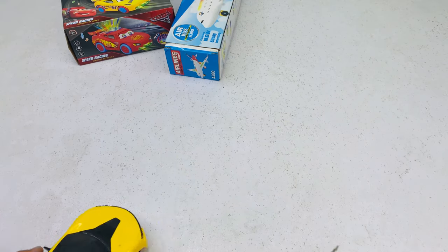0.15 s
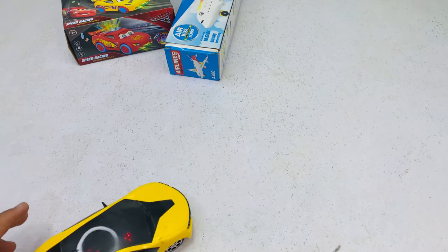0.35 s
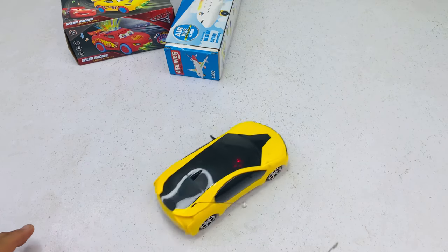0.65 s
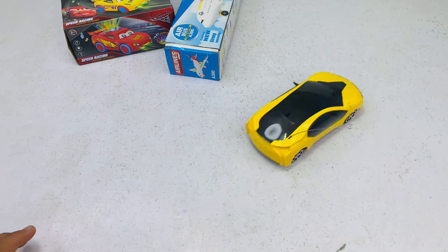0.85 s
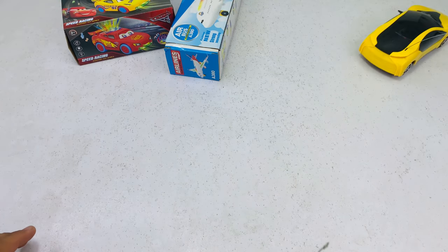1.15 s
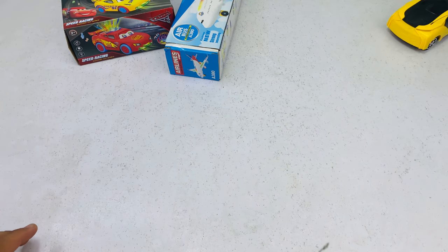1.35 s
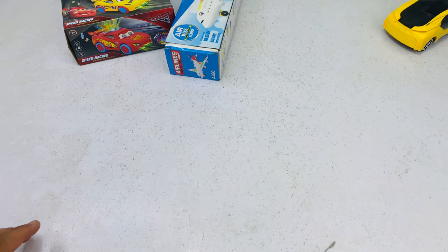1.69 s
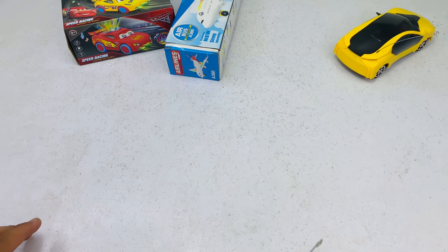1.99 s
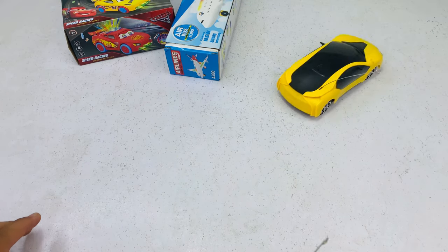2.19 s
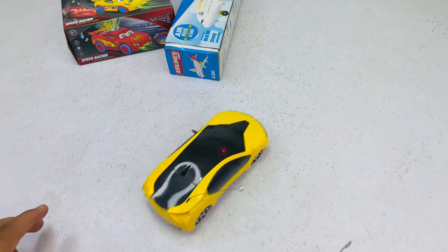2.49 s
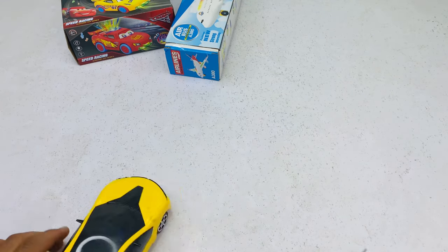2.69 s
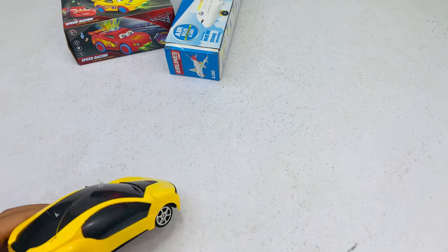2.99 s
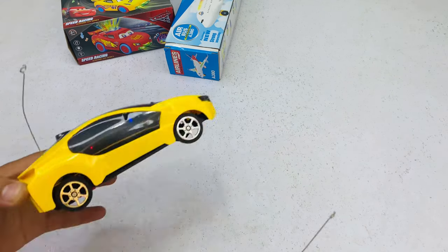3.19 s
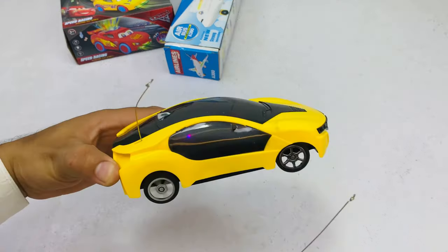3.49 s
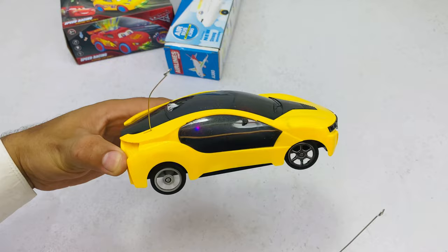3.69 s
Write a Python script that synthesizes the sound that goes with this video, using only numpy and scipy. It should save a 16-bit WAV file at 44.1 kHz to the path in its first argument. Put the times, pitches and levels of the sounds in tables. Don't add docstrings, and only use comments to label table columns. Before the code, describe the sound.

A toy car's plastic gears rattle and whir over hollow boards, then spin faster in the hand.

```python
import sys
import numpy as np
from scipy import signal
from scipy.fft import rfft, irfft, next_fast_len
from scipy.io import wavfile
from scipy.ndimage import uniform_filter1d, map_coordinates

SR = 44100
rng = np.random.default_rng(int(sys.argv[2]) if len(sys.argv) > 2 else 0)


def master_out(mix):
    frames = np.transpose(np.atleast_2d(mix))
    ceiling = np.clip(frames, -1, 1)
    pcm = np.round(ceiling * 32767).astype(np.int16)
    wavfile.write(sys.argv[1], SR, pcm)


def decibels_to_gain(level_db):
    exponent = np.asarray(level_db, float) / 20
    return 10 ** exponent


N = 169785

# time in seconds, effort in dB, brightness in dB.
DRIVE_EFFORT = [(0, -24, -6.5), (.11, -45, -4), (.26, -31, -4), (.32, -38, -4), (.66, -32, -0.5),
                (1.03, -28, 0), (1.2, -35, 5.5), (1.4, -48.5, 2), (1.47, -62, -10), (1.66, -60, -8),
                (1.73, -48, -0.5), (1.92, -38.5, 1.5), (2.01, -41, 0.5), (2.08, -34.5, 1.5),
                (2.6, -27.5, 0.5), (2.76, -38, 0), (2.85, -30, 4), (3.22, -54.5, 9)]
# time in seconds, nearness from 0 to 1.
NEARNESS = [
    (0, 0.96),
    (.6, 0.79),
    (1, 0.53),
    (1.4, 0.2),
    (1.9, 0.3),
    (2.4, 0.4),
    (2.8, 1),
]
# time in seconds, level in dB.
GEAR_STRAIN = [(0, -72.5), (.6, -57), (1.05, -58), (1.35, -84), (1.62, -78), (1.72, -56), (1.95, -53.5),
               (2.2, -52), (2.75, -50), (2.84, -43.5), (3.08, -52.5), (3.151, -80)]
# centre in Hz, width in Hz, level in dB.
WHINE_PEAKS = [(3550, 190, -1), (4360, 1000, 0)]
# centre in Hz, width in Hz, level in dB.
SHELL_ON_FLOOR = [(483.6, 40, 1), (643, 22, 3.5), (696, 41, -0.5), (770.7, 25, 6.5), (806.5, 15.5, 7),
                  (850, 26, 3.5), (901.5, 15.5, 6), (943, 29, 5), (988, 30, 3.5), (1039.6, 32, 4),
                  (1210, 122, -3.5), (1413, 130, -9.5), (3575, 147, -13.5), (4240, 850, -22.5)]
# frequency in Hz, level in dB.
FLOOR_FIZZ = [(250, -20), (900, -4), (1800, -7.5), (2900, -13.5), (4400, -17.5), (5500, -23.5),
              (11000, -26), (15000, -40)]
# time in seconds, level in dB.
BOARD_LOAD = [(0, -48.5), (.3, -55), (.66, -41), (.95, -40), (1.12, -32.5), (1.42, -41.5), (1.56, -57.5),
              (1.66, -45.5), (1.8, -41.5), (1.92, -34), (2.01, -36.5), (2.2, -34), (2.7, -39.5),
              (2.86, -47), (3.451, -56), (3.75, -46)]
# centre in Hz, width in Hz, level in dB.
BOARD_MODES = [(164.8, 5.1, -4), (194, 10.3, -1), (217.1, 9.8, 0), (236.8, 7.8, -2.5), (263.4, 17, -2.5),
               (305.6, 6.6, -2), (370, 40, -19)]
# start in seconds, peak in dB, pitch in Hz.
BUMPS = [(0.057, -26.5, 58.2), (0.148, -29, 70.2), (0.3, -25, 64.4), (0.359, -27, 64.2),
         (0.449, -27.5, 73.2), (0.514, -27.5, 66.6), (0.661, -29, 71.5), (0.781, -41, 68),
         (0.871, -24, 66.4), (1.022, -22.5, 68), (1.088, -28, 70.0), (1.177, -37, 71.2), (1.267, -30, 68.4),
         (1.429, -34, 79.6), (1.641, -41, 93.4), (1.72, -33.5, 83.7), (1.881, -33.5, 85.6),
         (2.051, -34, 64), (2.103, -29, 75), (2.206, -24, 69), (2.308, -20.5, 79.4), (2.417, -20, 71.5),
         (2.595, -29, 67), (2.675, -18.5, 64.6), (2.898, -46, 72.7)]
# time in seconds, effort in dB, brightness in dB.
SPIN_EFFORT = [
    (3.16, -57, -19),
    (3.25, -39.5, -13.5),
    (3.33, -34.5, -3.5),
    (3.45, -31, -0.5),
    (3.6, -29.5, -1),
    (3.7, -29.5, 1.5),
    (3.85, -32.5, 5),
]
# centre in Hz, width in Hz, level in dB.
SHELL_IN_HAND = [(486, 38, 2.5), (1047, 182, 1.5), (1204, 200, 3.5), (1393, 197, 2), (1634, 72, 1.5),
                 (2500, 990, -17), (3400, 130, -7.5), (4130, 1500, -13)]
# frequency in Hz, level in dB.
HAND_FIZZ = [(200, -26), (700, -6), (1500, -5), (3000, 2), (5500, -1), (8000, -2), (11000, -2),
             (15000, -19)]
# start in seconds, peak in dB.
WHEEL_KNOCKS = [(3.199, -44), (3.236, -37), (3.259, -33), (3.281, -28), (3.304, -21), (3.334, -22),
                (3.36, -21.5), (3.385, -20), (3.426, -21), (3.448, -22), (3.472, -14.5), (3.505, -18),
                (3.526, -14), (3.557, -14), (3.579, -22), (3.616, -26), (3.649, -19), (3.679, -20.5),
                (3.714, -35), (3.738, -30), (3.789, -21), (3.816, -26), (3.838, -22)]
# frequency in Hz, level in dB, t60 in seconds.
KNOCK_MODES = [(1180, -1, 0.019), (1407, 1, 0.016), (1610, -8.5, 0.016), (3350, -14, 0.007)]
# start in seconds, snap peak in dB, shake level in dB, length in seconds.
SHELL_JOLTS = [(0.034, -31, -32, 0.019), (0.135, -60, -31, 0.011), (0.195, -58, -26.5, 0.024),
               (0.253, -48, -27.5, 0.017), (0.464, -30, -31, 0.024), (0.5327, -29, -27.5, 0.016),
               (0.587, -44, -36, .01), (0.627, -29, -33, 0.013), (0.677, -37, -28, .01),
               (0.7694, -25.5, -26, 0.018), (0.808, -38, -29, .01), (0.944, -17, -27, 0.0097),
               (1.108, -33, -29, .015), (1.695, -55, -42.5, 0.032), (1.878, -30, -47, 0.0061),
               (2.063, -40, -25, 0.023), (2.09, -28, -22, 0.0066), (2.187, -35, -23, 0.0082),
               (2.305, -40, -24, .03), (2.316, -21, -29, 0.012), (2.554, -35, -22, .008),
               (2.64, -18, -40, 0.0034), (2.646, -13.5, -14.5, 0.013), (2.655, -19.5, -22.5, 0.0093),
               (2.676, -20, -18, 0.015), (2.735, -53, -20.5, 0.0089), (2.777, -42, -26, 0.008),
               (2.799, -38, -42, 0.0065), (2.825, -25, -30, 0.028), (2.846, -22, -26.5, 0.056),
               (2.907, -24, -54, 0.059), (2.967, -28, -45, 0.0045), (3.038, -25, -31, 0.012),
               (3.112, -19, -25.5, 0.0067), (3.195, -40, -47, 0.024), (3.26, -26, -29, 0.0056),
               (3.318, -30, -30, 0.0055), (3.3825, -21, -27, 0.006), (3.446, -23, -40, 0.0054),
               (3.715, -26, -27, 0.0092)]
# frequency in Hz, level in dB.
SNAP_COLOUR = [(800, -41), (2000, 10), (4500, 2), (8000, -2.5), (12000, -15.5), (15500, -79.5)]
# frequency in Hz, t60 in seconds.
WALL_T60 = [(100, 0.48), (1000, 0.2), (5000, 0.14), (12000, 0.019)]
# frequency in Hz, level in dB.
ROOM_COLOUR = [(15, -40), (25, 6), (80, 6), (120, -17), (146, 4), (248, -30), (475, -12), (8000, -81),
               (10400, -93), (17600, -120)]
# frequency in Hz, left-right likeness from 0 to 1.
PORT_LIKENESS = [(60, 0.91), (250, 0.89), (700, 0.27), (3000, 0.27), (5500, 0.13), (7200, 0.71),
                 (8500, 0.78)]
# frequency in Hz, lead of the left port in radians.
PORT_LEAD = [(0, 0), (1380, .4), (1640, 1.6), (4050, .2), (6950, 0), (15150, -4 * np.pi)]

HUM_DB, HUM_WIDTH_HZ = -8, 6.1
BOARD_HZ, BOARD_ATTACK_S, BOARD_DB, BOARD_T60_S = 69.3, 0.0029, 0.5, 0.56
SPOT_DB, SPOT_RATE_HZ = 2, 6
NEAR_AIR_DB, AIR_HZ = 19, 6400
LIFT_S = 2.9
KNOCK_DB, KNOCK_RISE_S = -1.5, .0012
PAN_FAR_DB, PAN_NEAR_DB, PAN_HAND_DB = -1, 3.5, 6.5
WALLS_DB, ROOM_TONE_DB = -11, -52
SUB_HZ, TOP_HZ, TOP_LEVEL = 38, 15900, .3


def noise():
    return rng.standard_normal(N)


def unit(x):
    return x / np.sqrt(np.mean(x ** 2) + 1e-20)


def along(points, hz):
    point_hz, value = np.transpose(points)
    return np.interp(np.log(hz + 1), np.log(point_hz + 1), value)


def over_time(points, right=None):
    return np.interp(np.arange(N) / SR, *np.transpose(points), right=right)


def curves(rows):
    s, effort_db, bright_db = np.transpose(rows)
    t = np.arange(N) / SR
    return np.interp(t, s, effort_db, left=-120, right=-120), np.interp(t, s, bright_db)


def wobble(rate_hz):
    knots = rng.standard_normal(int(N * rate_hz / SR) + 4)
    return map_coordinates(knots, [np.arange(N) * rate_hz / SR])


def filtered(x, response):
    size = next_fast_len(N + SR // 2)
    hz = np.fft.rfftfreq(size, 1 / SR)
    return irfft(rfft(x, size) * response(hz), size)[..., :N]


def resonant(x, peaks):
    def body(hz):
        total = 0
        for k, (centre, width, db) in enumerate(peaks):
            damping = 1j * hz * width
            total = total + (-1) ** k * decibels_to_gain(db) * damping / (centre ** 2 - hz ** 2 + damping)
        return total
    return unit(filtered(x, body))


def coloured(x, spectrum):
    return unit(filtered(x, lambda hz: decibels_to_gain(along(spectrum, hz))))


def chatter(per_s, spread_db, burst_s, hiss):
    chance, size = rng.random((2, N))
    hits = (chance < per_s / SR) * decibels_to_gain(-spread_db * np.log(size + 1e-2))
    scrapes = signal.lfilter([1], [1, -np.exp(-1 / (burst_s * SR))], hits)
    return unit(scrapes) + hiss


def drive():
    effort_db, bright_db = curves(DRIVE_EFFORT)
    near = over_time(NEARNESS)
    teeth = chatter(per_s=600, spread_db=2, burst_s=.0012, hiss=1.1)
    ring = resonant(teeth * noise(), SHELL_ON_FLOOR) * decibels_to_gain(effort_db - 1.5 + 0.58 * wobble(46))
    fizz = coloured(teeth * noise(), FLOOR_FIZZ) * decibels_to_gain(effort_db - 6 + bright_db + 1.5 * wobble(11))
    air = filtered(fizz, lambda hz: hz ** 4 / (hz ** 4 + AIR_HZ ** 4))
    fizz = fizz + air * (decibels_to_gain(NEAR_AIR_DB * (near - 1.0)) - 1)
    hum_db = uniform_filter1d(effort_db, size=3000) + HUM_DB
    hum = resonant(noise(), [(BOARD_HZ, HUM_WIDTH_HZ, 0)]) * decibels_to_gain(hum_db)
    whine = resonant(resonant(teeth * noise(), WHINE_PEAKS), WHINE_PEAKS)
    whine = whine * decibels_to_gain(over_time(GEAR_STRAIN, right=-120))
    return ports(ring + fizz + hum + whine, PAN_FAR_DB + (PAN_NEAR_DB - PAN_FAR_DB) * near)


def boards():
    tyres = chatter(per_s=200, spread_db=1.5, burst_s=.004, hiss=1.8) * noise()
    modes = np.zeros(N)
    for hz, width, db in BOARD_MODES:
        modes += decibels_to_gain(db + SPOT_DB * wobble(SPOT_RATE_HZ)) * resonant(tyres, [(hz, width, 0)])
    return ports(unit(modes) * decibels_to_gain(over_time(BOARD_LOAD)), 0)


def thumps():
    t, out = np.arange(N) / SR, np.zeros(N)
    for s, db, hz in BUMPS:
        age = np.maximum(t - s, 0)
        decay = decibels_to_gain(db + BOARD_DB - 60 * age / BOARD_T60_S)
        out += decay * (1 - np.exp(-age / BOARD_ATTACK_S)) * np.sin(2 * np.pi * hz * age)
    return out


def spin():
    effort_db, bright_db = curves(SPIN_EFFORT)
    teeth = chatter(per_s=400, spread_db=2, burst_s=.0012, hiss=1.4)
    ring = resonant(teeth * noise(), SHELL_IN_HAND) * decibels_to_gain(effort_db - 1.5 + .6 * wobble(20))
    whirr = chatter(per_s=500, spread_db=2.5, burst_s=.0011, hiss=1.2) + .5 * teeth
    fizz = coloured(whirr * noise(), HAND_FIZZ) * decibels_to_gain(effort_db - 3 + bright_db + .5 * wobble(9))
    return ring + fizz


def knocks():
    age, out = np.arange(SR // 20) / SR, np.zeros(N + SR)
    rise = 1 - np.exp(-age / KNOCK_RISE_S)
    for s, db in WHEEL_KNOCKS:
        ring = np.zeros(len(age))
        for hz, level_db, t60_s in KNOCK_MODES:
            luck_db, detune = 2.7 * rng.standard_normal(), 1 + 0.044 * rng.standard_normal()
            decay = decibels_to_gain(level_db + luck_db - 60 * age / t60_s)
            ring += decay * np.sin(2 * np.pi * hz * detune * age)
        out[round(s * SR):][:len(age)] += decibels_to_gain(db + KNOCK_DB) * rise * ring
    return out[:N]


def jolts():
    age, snap, shake = np.arange(SR // 5) / SR, np.zeros(N + SR), np.zeros(N + SR)
    for s, snap_db, shake_db, length_s in SHELL_JOLTS:
        shape = np.exp(-age / max(length_s, .001)) + .4 * np.exp(-age / .002)
        snap[round(s * SR):][:len(age)] += decibels_to_gain(snap_db - 15.5) * shape
        shake[round(s * SR):][:len(age)] += decibels_to_gain(shake_db - 7.0) * shape
    on_floor = np.arange(N) < LIFT_S * SR
    shell = np.where(on_floor, resonant(noise(), SHELL_ON_FLOOR), resonant(noise(), SHELL_IN_HAND))
    grit = unit(chatter(per_s=700, spread_db=2, burst_s=.001, hiss=.6))
    return grit * snap[:N] * coloured(noise(), SNAP_COLOUR) + shake[:N] * shell


def walls(x):
    hz, t, z = signal.stft(rng.standard_normal(SR // 2), SR, nperseg=256)
    decay = decibels_to_gain(-60 * t / along(WALL_T60, hz)[:, None])
    tail = signal.istft(z * decay, SR, nperseg=256)[1]
    return signal.fftconvolve(x, tail[None] / np.linalg.norm(tail), axes=1)[:, :N]


def room_tone():
    return decibels_to_gain(ROOM_TONE_DB) * ports(coloured(noise(), ROOM_COLOUR), 0)


def ports(x, pan_db):
    z = signal.stft(x, nperseg=256)[2]
    start = 2 * np.pi * rng.random((len(z), 1))
    drift = np.cumsum(0.348 * rng.standard_normal(z.shape), axis=1) + start
    other = signal.istft(z * np.exp(1j * drift), nperseg=256)[1][:N]
    other *= np.linalg.norm(x) / np.linalg.norm(other)

    def spread(hz):
        turn = np.arccos(np.clip(along(PORT_LIKENESS, hz), -1, 1)) / 2
        return np.array([np.cos(turn), np.sin(turn)])

    def lead(hz):
        return np.exp(.5j * np.interp(hz, *np.transpose(PORT_LEAD)) * np.array([[1], [-1]]))

    def balance(hz):
        return along([(200, 0.2), (700, 0.51), (5500, 0.59), (6600, 0.23)], hz)

    mid, side = filtered(np.array([x, other]), spread)
    pair = filtered(np.array([mid + side, mid - side]), lead)
    return pair + filtered(pair, balance) * (decibels_to_gain(np.array([[.5], [-.5]]) * pan_db) - 1)


def scene():
    held = ports(spin() + jolts(), PAN_HAND_DB) + decibels_to_gain([[1.5], [-1.5]]) * knocks()
    car = drive() + boards() + held
    return car + decibels_to_gain(WALLS_DB) * walls(car) + thumps() + room_tone()


def low_pass(x):
    return signal.sosfilt(signal.butter(12, 16370, fs=SR, output="sos"), x)


def record(dry):
    limited = dry / (1.5 + np.abs(dry / TOP_LEVEL) ** 4) ** (1 / 4)
    mix = filtered(limited, lambda hz: (hz < TOP_HZ) * hz ** 4 / (hz ** 4 + SUB_HZ ** 4))
    return low_pass(mix)


dry = scene()
out = record(dry)
master_out(out)
```